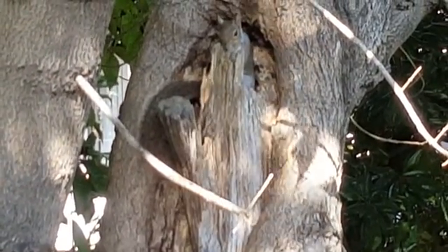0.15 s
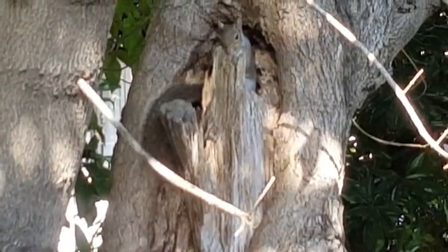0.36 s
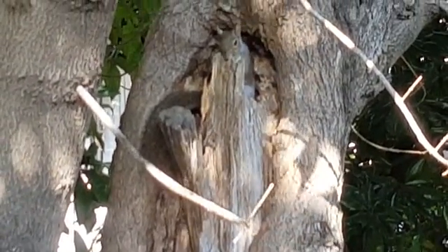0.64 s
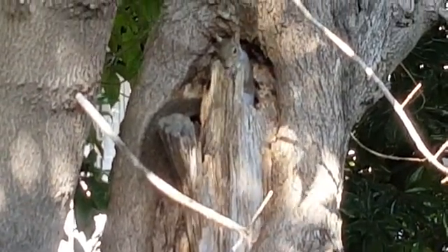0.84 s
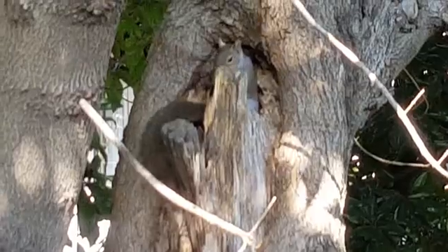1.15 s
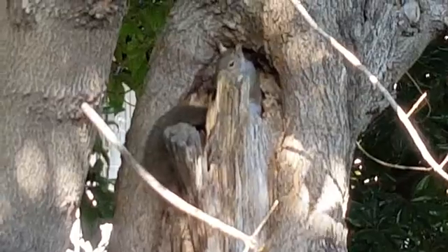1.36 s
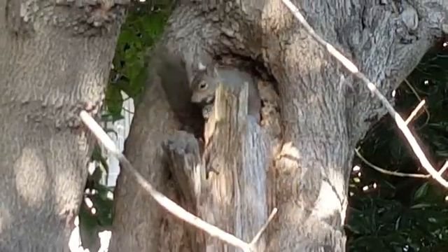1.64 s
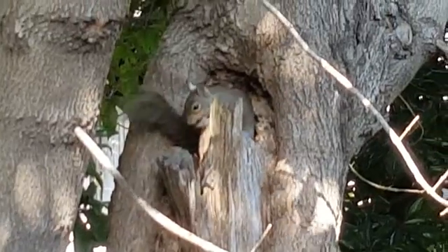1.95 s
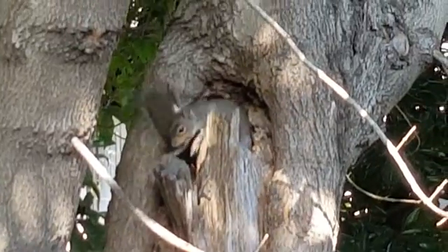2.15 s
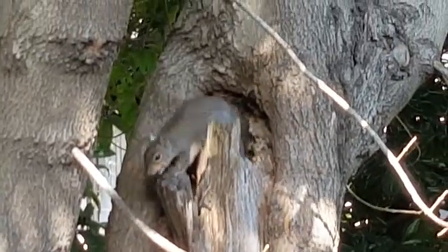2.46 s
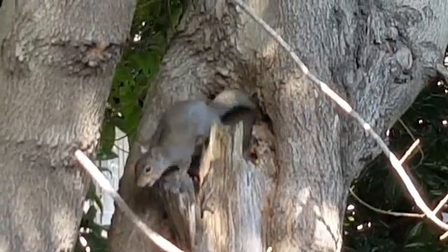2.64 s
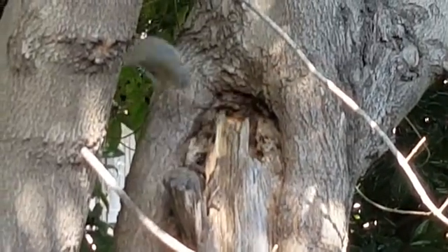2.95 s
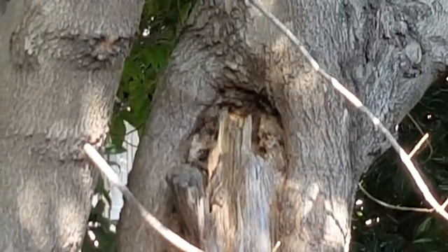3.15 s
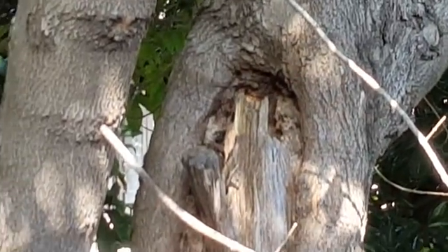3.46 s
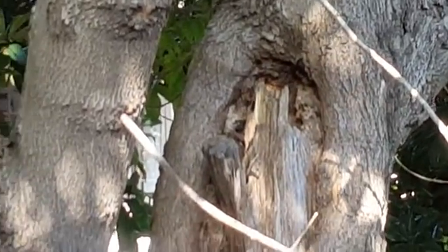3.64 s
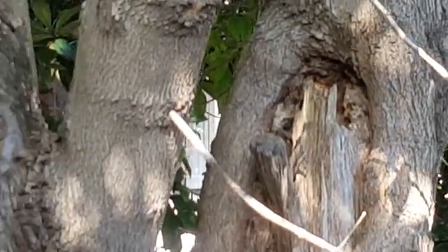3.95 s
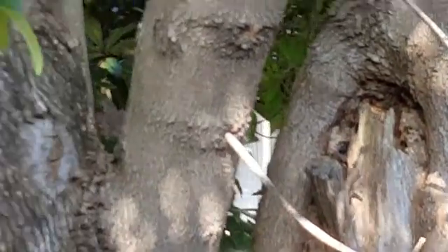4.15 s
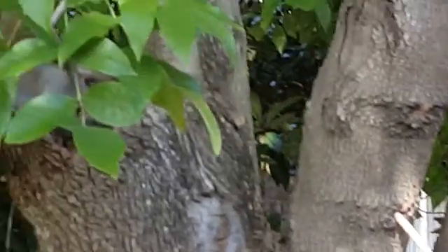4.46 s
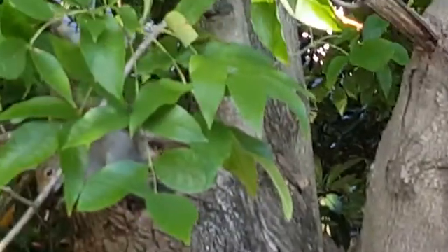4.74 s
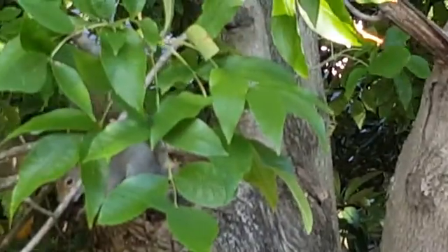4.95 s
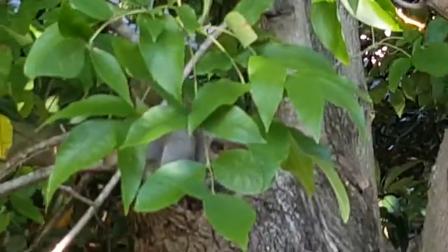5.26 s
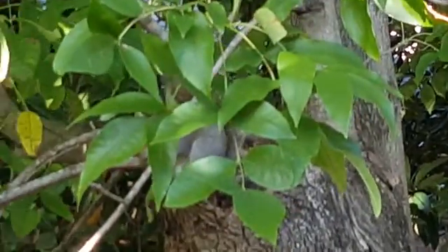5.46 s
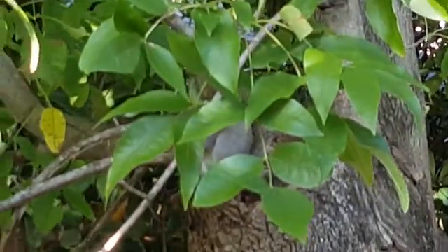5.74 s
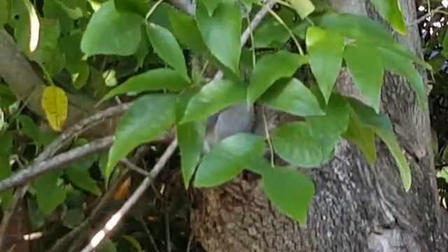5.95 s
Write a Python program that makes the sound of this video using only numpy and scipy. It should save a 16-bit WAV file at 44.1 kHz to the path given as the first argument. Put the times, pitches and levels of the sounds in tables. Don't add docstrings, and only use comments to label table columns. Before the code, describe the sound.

A handheld stereo microphone outdoors catches a squirrel's raspy, clipped barks, mostly a quarter to a third of a second apart, with a few longer gaps early and a quicker cluster past the middle. Each is dry and noisy, with short scattered echoes from trunks and leaves. Behind runs a constant low electrical-sounding hum, muffled town noise and a distant engine that drones and pulls upward twice. Leaves rustle very faintly.

```python
import sys
import numpy as np
from scipy import signal
from scipy.fft import rfft, irfft
from scipy.io import wavfile
from scipy.ndimage import uniform_filter1d

SR = 44100
rng = np.random.default_rng(int(sys.argv[2]) if len(sys.argv) > 2 else 0)


def field_ratio(decibels):
    return 10 ** (np.asarray(decibels, dtype=float) / 20)


def master_out(mix):
    frames = np.transpose(np.atleast_2d(mix))
    ceiling = np.clip(frames, -1, 1)
    pcm = np.round(ceiling * 32767).astype(np.int16)
    wavfile.write(sys.argv[1], SR, pcm)


N = 269284

# t/s, push length/s, breath level/dB, voicing over breath/dB, mouth ring over breath/dB
BARKS = [(0.046, 0.023, -55, 2, 2.5), (.198, 0.04, -52, 0, -5), (.517, 0.072, -50.5, -1.5, -3.5),
         (1.165, 0.097, -51, -3, -2), (1.539, 0.056, -50, 3.5, -3), (1.832, 0.064, -50.5, 4, 2),
         (2.163, 0.058, -50, 4, 4), (2.437, 0.053, -48, 2.5, -1.5), (2.705, 0.059, -47.5, 1, 2.5),
         (3.228, 0.061, -53.5, 4.5, 2), (3.511, 0.06, -49, -0.5, 8), (3.741, 0.059, -51, 5.5, 4.5),
         (3.881, 0.04, -47.5, 3, 1.5), (4.041, 0.046, -48.5, 4, -1), (4.229, 0.05, -48.5, 4, 1),
         (4.426, 0.052, -48.5, 1.5, 1.5), (4.689, 0.063, -47.5, 3.5, 2.5), (5.048, 0.066, -47, 3.5, -8),
         (5.286, 0.047, -46.5, 1, -8), (5.5, 0.051, -48, -2.5, -14), (5.847, 0.058, -46.5, -1.5, -10)]
# chest f/Hz, throat f/Hz, palate f/Hz, mouth f/Hz, palate ring over breath/dB
POSTURES = [(1114, 1580, 2090, 3230, -14), (1112, 1690, 2090, 3800, -26), (1067, 1670, 2500, 3300, -27),
            (1140, 1707, 2470, 3620, -8), (1120, 1655, 2694, 3200, -7), (1136, 1680, 2700, 3120, -10),
            (1160, 1590, 2400, 3120, -8), (1126, 1400, 2180, 2950, -11), (1186, 1420, 2700, 3080, -16),
            (1180, 1480, 2280, 2970, -8), (900, 1650, 2800, 3220, -13), (1180, 1500, 2100, 3120, -15),
            (734, 1400, 2300, 3080, -12.5), (783, 1380, 2230, 3000, -23), (832, 1370, 2630, 3100, -13),
            (779, 1610, 2500, 3130, -15), (783, 1540, 2360, 3130, -12), (969, 1490, 2480, 3200, -23),
            (997, 1524, 2420, 3080, -13), (786, 1580, 2200, 3620, -17), (821, 1510, 2400, 3124, -14.5)]
# f/Hz, level/dB
HISS_COLOUR = [(1700, -13.5), (2200, -6.5), (3500, -7), (4800, -16), (6300, -6.5), (8500, -2), (9500, -1),
               (11000, -4), (13500, -11), (14500, -20), (15300, -26)]
# f/Hz, width/Hz
CAVITIES = [(4030, 810), (5180, 880), (7220, 440), (8000, 400)]
CAVITY_DB = [-12.5, -14.5, -11, -10]
# f/Hz, width/Hz, depth/0-1
NOTCHES = [(4300, 300, 0.34), (5670, 170, 0.74), (8300, 400, 0.23)]
# f/Hz, level/dB
GLINT_COLOUR = [(300, -14), (650, -22), (1100, 8.5), (1700, -1.5), (15000, 5)]
# f/Hz, left over right/dB
SHADE = [(600, -4), (1200, 1.5), (2000, -1.5), (4500, -2), (9500, 0.5), (11000, -1.5), (14000, -7)]
# f/Hz, level/dB
SCATTER_COLOUR = [(500, 1.0), (3000, -4), (7500, -3.0), (11000, -6), (15000, -26)]
# t/s, f/Hz, level/dB
HUM = [(0, 120, -43.5), (2, 120.1, -45.5), (4, 121, -44.5), (6.1, 119.6, -45)]
# t/s, f/Hz, level/dB
IDLE = [
    (0.0, 79.9, -55),
    (0.75, 79, -51),
]
# t/s, f/Hz, level/dB
DRONE = [
    (2.3, 101.8, -46),
    (3.3, 101.8, -44.5),
    (4.0, 106.4, -44.5),
    (4.5, 113, -43.5),
]
# t/s, f/Hz, level/dB
PULL = [
    (4.75, 78.9, -49),
    (5.2, 83.6, -45.5),
    (5.67, 93.2, -43),
    (6.1, 96.2, -47),
]
# t/s, f/Hz, level/dB
WHINE = [(0.0, 393, -55), (0.45, 397.3, -62.5), (0.9, 400.5, -55), (1.3, 400, -53.5), (1.58, 399, -56.5)]
# t/s, level/dB
BREEZE = [(0.0, -63), (0.29, -72), (1.5, -71.5), (3.1, -66), (4.0, -63), (5.2, -65.5), (5.65, -62),
          (6.1, -63)]
# f/Hz, level/dB
LEAF_COLOUR = [(1500, 2.5), (3000, -0.5), (5000, -1), (8000, -3), (11000, -10.5), (15500, -16)]
# f/Hz, level/dB
TOWN_COLOUR = [(15, -62), (25, -27), (71, -7.5), (122, -2), (144, -7.5), (221, -9.5), (253, -10.5),
               (400, -15), (433, -16.5), (567, -22.5), (827, -18), (1080, -23), (1380, -26), (3350, -39),
               (15500, -60)]
# f/Hz, likeness/-1 to 1
TOWN_LIKENESS = [(30, 0.92), (60, 1), (130, 0.96), (290, 0.93), (640, 0.48), (1100, -0.065), (1700, -0.27),
                 (3100, 0.41), (6800, -0.68), (15000, 0.35)]

BARK_S, BURST_S, SWELL_DB, RELEASE_DB_PER_S = 0.2, 0.008, 4, 450
RASP_DB = 2.5
CHEST_SAG_DB, THROAT_SAG_DB, MOUTH_ARCH_DB, MOUTH_SAG_DB = 4, 2.5, 4.5, 4.5
LOW_CHEST_DB_PER_OCTAVE, HIGH_THROAT_DB_PER_OCTAVE = 6, 11.5
JAW_SPREAD_DB, CAVITY_SHIFT = 2, 0.025
JET_LAG_S, JET_LAG_DB = 0.01, 1.5
EDGE_HZ, EDGE_SWELL_DB = 10700, 8
HEAD_TURN_DB = 1.2
NEAR_T60_S, NEAR_DB = 0.03, 8
SCATTER_T60_S, SCATTER_DB, SCATTER_GAP_S = 0.31, -6.5, 0.0119
TOWN_DB, TOWN_SWELL_DB, TOWN_SWELL_RATE_HZ = -42, 0.5, 3
TOP_HZ, STARVE_DB = 14700, -62


def barks():
    out = np.zeros((2, N))
    for row, posture in zip(BARKS, POSTURES):
        start, voice = bark(row, posture)
        out[:, start:start + voice.shape[1]] += voice[:, :N - start]
    left = coloured(out[0], np.multiply(SHADE, [1, 0.5]))
    right = coloured(out[1], np.multiply(SHADE, [1, -0.5]))
    return np.array([left, right])


def bark(row, posture):
    burst_s, push_s, breath_db, voicing_db, ring_db = row
    chest_hz, throat_hz, palate_hz, mouth_hz, palate_db = posture
    start = round(burst_s * SR - BURST_S * SR)
    count = 2 * round(BARK_S * SR / 2)
    t = np.arange(count) / SR

    push = np.clip((t - BURST_S) / push_s, 0, 1)
    sag = 1 - 2 * push
    effort_db = breath_db - SWELL_DB * (1 - push) ** 2
    effort_db = effort_db - RELEASE_DB_PER_S * np.maximum(t - BURST_S - push_s, 0)
    chest_db = voicing_db + CHEST_SAG_DB * sag + LOW_CHEST_DB_PER_OCTAVE * np.log2(1100 / chest_hz)
    throat_db = voicing_db + THROAT_SAG_DB * sag
    mouth_db = ring_db + MOUTH_ARCH_DB * np.sin(np.pi * push) + MOUTH_SAG_DB * sag
    jet_db = 3.0 - JET_LAG_DB * np.exp(-t / JET_LAG_S)

    air = rng.standard_normal((2, count))
    wobble, rasp = uniform_filter1d(rng.standard_normal((2, count)), size=120)
    folds_hz = chest_hz * (1 + 0.1258 * rms_one(wobble))
    folds = np.cos(2 * np.pi * np.cumsum(folds_hz) / SR)
    chopped = air * (1 + 1.16 * folds) * field_ratio(RASP_DB * rms_one(rasp))
    breath = chopped + 0.56 * folds

    chest = resonance(breath, chest_hz, 146) + 1.07 * band(air, 740, 1275)
    tight_db = HIGH_THROAT_DB_PER_OCTAVE * np.log2(throat_hz / 1450)
    throat = field_ratio(tight_db) * resonance(breath, throat_hz, 110) + 0.59 * band(air, 700, 2280)
    mouth = resonance(breath, mouth_hz, 300)
    hiss = teeth_hiss(breath, palate_hz, palate_db, push)

    voice = field_ratio(chest_db - 6.5) * chest + field_ratio(throat_db - 3) * throat
    voice = voice + field_ratio(mouth_db - 8) * mouth + field_ratio(jet_db) * hiss
    opening = np.clip(t / BURST_S, 0, 1) ** 2
    front, flank = field_ratio(effort_db) * opening * voice
    pan_db = HEAD_TURN_DB * rng.standard_normal()
    return start, near_wood(front, flank) * field_ratio([[pan_db / 2], [-pan_db / 2]])


def teeth_hiss(breath, palate_hz, palate_db, push):
    cavities = field_ratio(palate_db) * resonance(breath, palate_hz, 190)
    for (hz, width_hz), level_db in zip(CAVITIES, CAVITY_DB):
        ring_db = level_db + JAW_SPREAD_DB * rng.standard_normal()
        ring_hz = hz * (1 + CAVITY_SHIFT * rng.standard_normal())
        cavities = cavities + field_ratio(ring_db) * resonance(breath, ring_hz, width_hz)
    cavities = signal.sosfilt(signal.butter(2, 10500, fs=SR, output="sos"), cavities)
    hiss = notched(rms_one(coloured(breath, HISS_COLOUR)) + cavities)
    edge = signal.sosfiltfilt(signal.butter(2, EDGE_HZ, "high", fs=SR, output="sos"), hiss)
    edge_gain = field_ratio(2.0 - EDGE_SWELL_DB * (1 - push) ** 2)
    return hiss + (edge_gain - 1) * edge


def notched(x):
    hz = np.fft.rfftfreq(x.shape[-1], 1 / SR)
    keep = np.ones(len(hz))
    for centre_hz, width_hz, depth in NOTCHES:
        keep *= 1 - np.clip(depth, 0, 1) / (1 + (2 * (hz - centre_hz) / width_hz) ** 2)
    return irfft(rfft(x) * keep, x.shape[-1])


def near_wood(front, flank):
    t = np.arange(SR // 20) / SR
    size = len(front) + len(t) + len(t) % 2
    glints = rfft(rng.standard_normal((2, len(t))) * field_ratio(-60 * t / NEAR_T60_S), size)
    glints = glints / np.sqrt(uniform_filter1d(abs(glints) ** 2, size=10))
    wet = field_ratio(NEAR_DB + at_hz(GLINT_COLOUR, bins_hz(size)))
    front, flank = rfft(front, size), rfft(flank, size)
    faces = np.array([0.73 * front + 0.5 * flank, 0.88 * front - 0.5 * flank])
    return irfft((front + wet * glints * faces) / np.hypot(1, wet), size)


def scatter(x):
    t = np.arange(SR // 2) / SR
    cloud = rng.standard_normal((2, len(t))) * field_ratio(-60 * t / SCATTER_T60_S) * (t > SCATTER_GAP_S)
    cloud = coloured(cloud, SCATTER_COLOUR)
    cloud = cloud / np.sqrt(np.sum(cloud ** 2) / 2)
    return field_ratio(SCATTER_DB) * signal.fftconvolve(x.mean(0, keepdims=True), cloud, axes=1)[:, :N]


def machines():
    engine = tone(IDLE, 1.0, -26) + tone(DRONE, 0.76, -33) + tone(PULL, 1.6, -26) + tone(WHINE, 0.77, -21)
    return tone(HUM, 0.66, -18) + engine


def tone(rows, flutter_db, side_db):
    hz, level_db = in_time(rows)
    t = np.arange(N) / SR
    fade_in = np.clip((t - rows[0][0]) / 0.1 + 1, 0, 1)
    fade_out = np.clip((rows[-1][0] - t) / 0.12 + 1, 0, 1)
    phase = 2 * np.pi * np.cumsum(hz) / SR + 0.5 * drift(0.5)
    height = np.sqrt(2) * fade_in * fade_out * field_ratio(level_db + flutter_db * drift(11.0))
    return height * (np.sin(phase) + field_ratio(side_db) * np.cos(phase) * [[1], [-1]])


def leaves():
    level_db, = in_time(BREEZE)
    rustle = rms_one(coloured(rng.standard_normal((2, N)), LEAF_COLOUR))
    return field_ratio(level_db + 3 + 1.3 * drift(9.2)) * rustle


def town():
    mid, side = coloured(rng.standard_normal((2, N)), TOWN_COLOUR)
    wash = rms_one(pair(mid, side, TOWN_LIKENESS))
    return field_ratio(TOWN_DB + TOWN_SWELL_DB * drift(TOWN_SWELL_RATE_HZ)) * wash


def rms_one(x):
    return x / np.sqrt(np.mean(x ** 2) + 1e-20)


def in_time(rows):
    s, *columns = np.transpose(rows)
    return [np.interp(np.arange(N) / SR, s, c) for c in columns]


def bins_hz(size):
    return np.maximum(np.fft.rfftfreq(size, 1 / SR), 1)


def at_hz(points, hz):
    table_hz, value = np.transpose(points)
    return np.interp(np.log(hz), np.log(table_hz), value)


def drift(rate_hz):
    r = np.exp(-80 * np.pi * rate_hz / SR)
    noise = rng.standard_normal(N // 40 + 2002)
    slow = signal.lfilter([1], [1, -2 * r, r * r], noise)[2000:]
    return np.interp(np.arange(N) / 40, np.arange(len(slow)), rms_one(slow))


def coloured(x, spectrum):
    size = x.shape[-1]
    return irfft(rfft(x) * field_ratio(at_hz(spectrum, bins_hz(size))), size)


def pair(mid, side, likeness):
    alike = np.clip(at_hz(likeness, bins_hz(len(mid))), -1, 1)
    m = rfft(mid) * np.sqrt(1 + alike)
    s = rfft(side) * np.sqrt(1 - alike)
    return irfft(np.array([m + s, m - s]), len(mid))


def resonance(x, hz, width_hz):
    r = np.exp(-np.pi * width_hz / SR)
    ring = [1, -2 * r * np.cos(2 * np.pi * hz / SR), r * r]
    return rms_one(signal.lfilter([1, 0, -1], ring, x))


def band(x, low_hz, high_hz):
    sos = signal.butter(2, [low_hz, high_hz], "band", fs=SR, output="sos")
    return rms_one(signal.sosfilt(sos, x))


def scene():
    voice = barks()
    return voice + scatter(voice) + machines() + leaves() + town()


def top_cut(x):
    return signal.sosfilt(signal.butter(12, 15690, fs=SR, output="sos"), x)


def record(dry):
    top = signal.sosfiltfilt(signal.butter(8, TOP_HZ, "high", fs=SR, output="sos"), dry)
    bright = signal.sosfilt(signal.butter(2, 4000, "high", fs=SR, output="sos"), dry.mean(0))
    level = np.sqrt(uniform_filter1d(bright ** 2, size=1500) + 1e-14)
    starved = 1 / (1 + (field_ratio(STARVE_DB) / level) ** 6)
    mix = dry - starved * top
    return top_cut(mix)


dry = scene()
out = record(dry)
master_out(out)
```